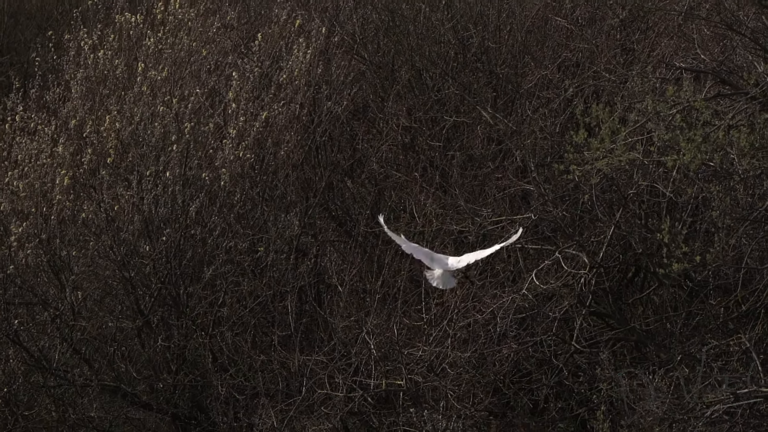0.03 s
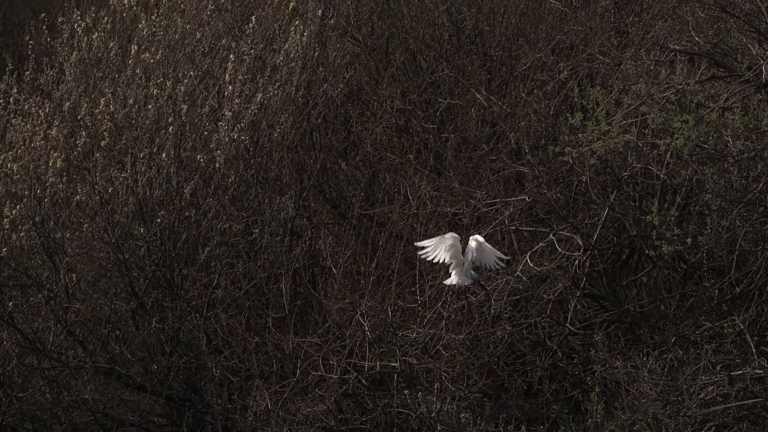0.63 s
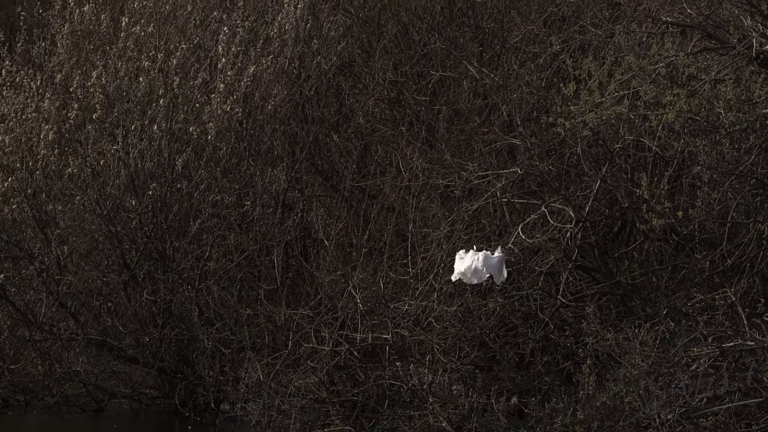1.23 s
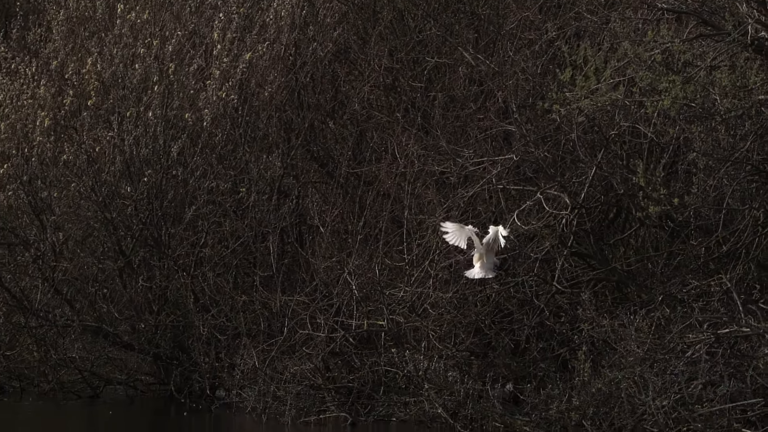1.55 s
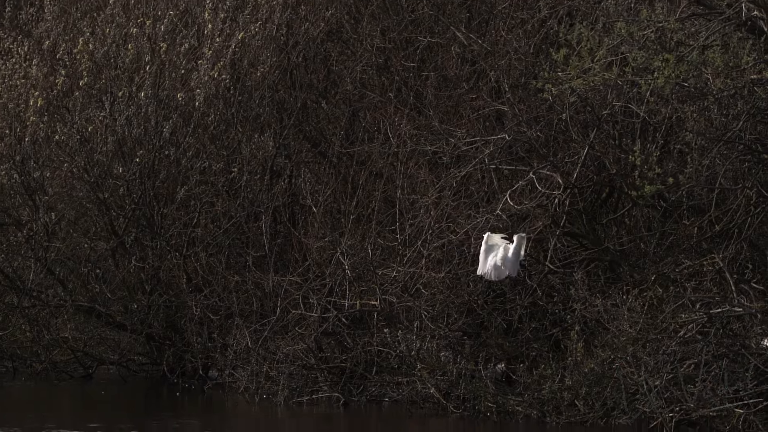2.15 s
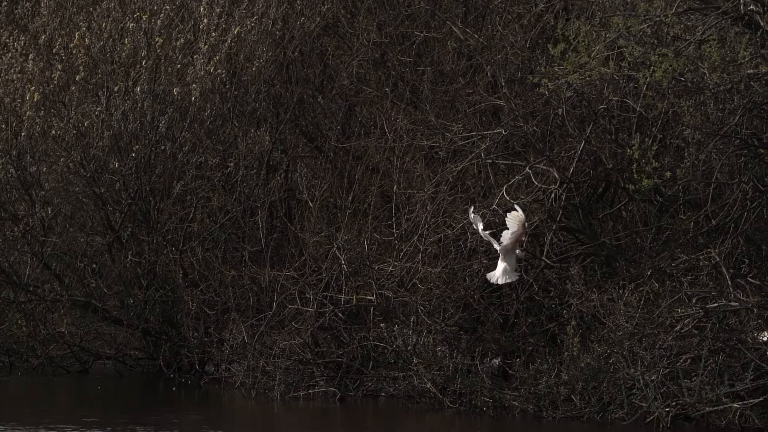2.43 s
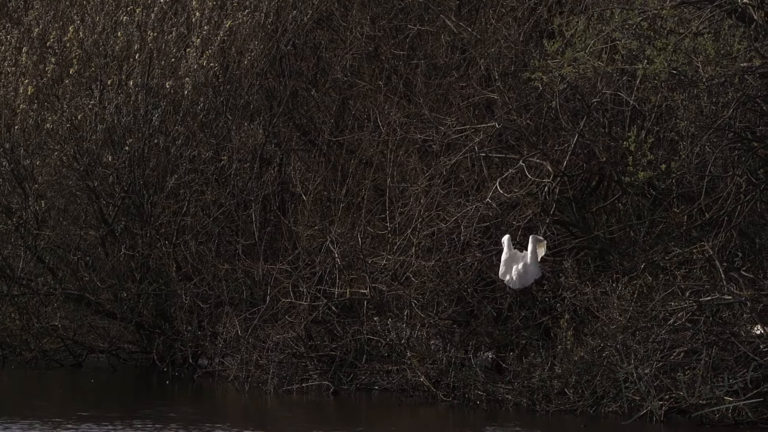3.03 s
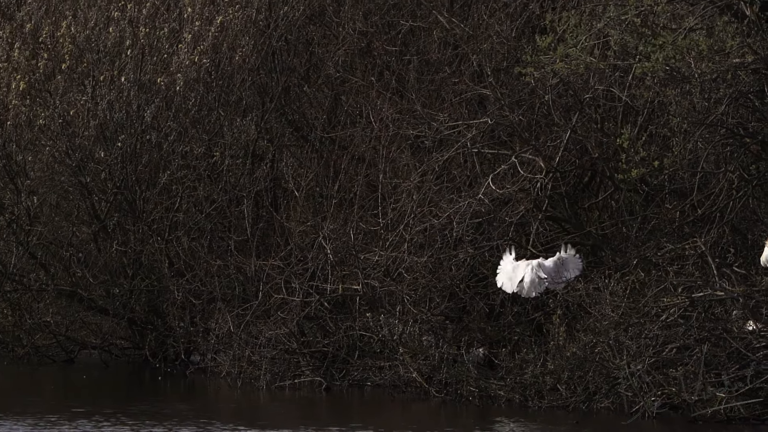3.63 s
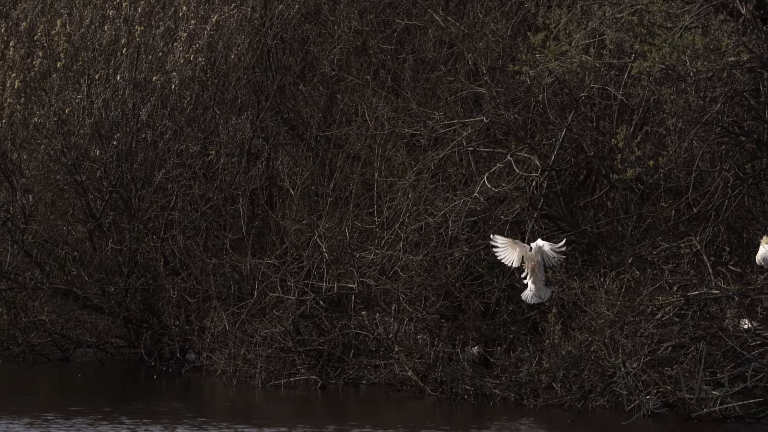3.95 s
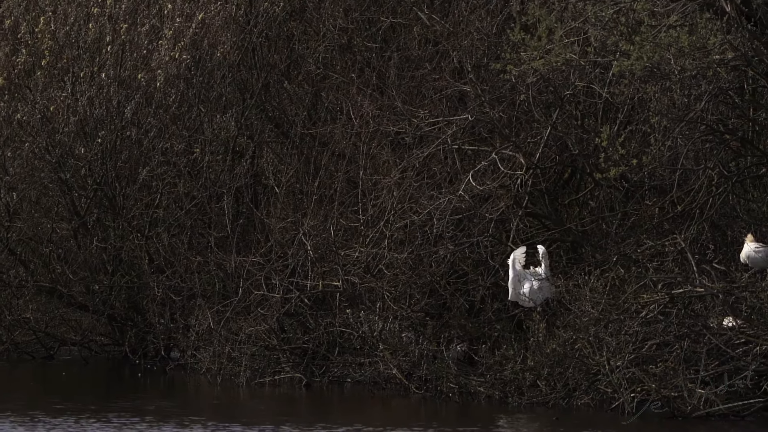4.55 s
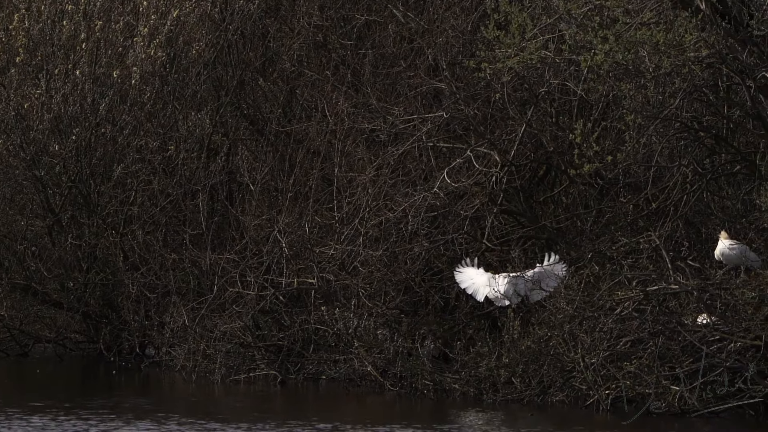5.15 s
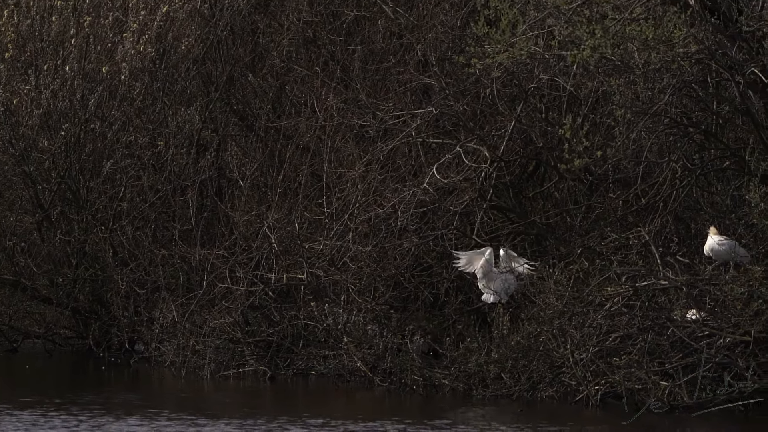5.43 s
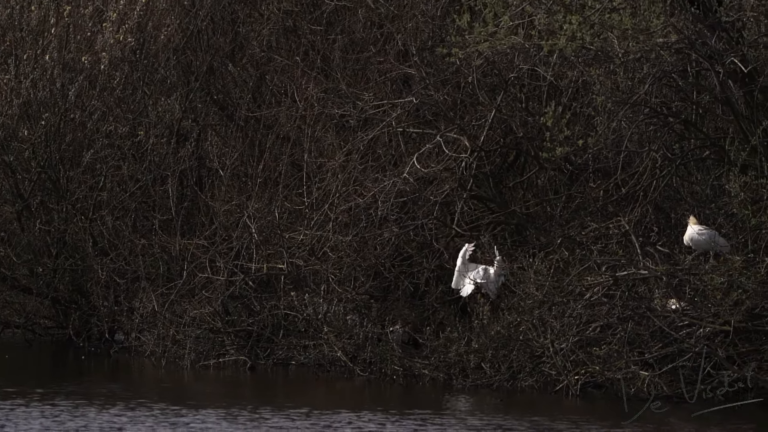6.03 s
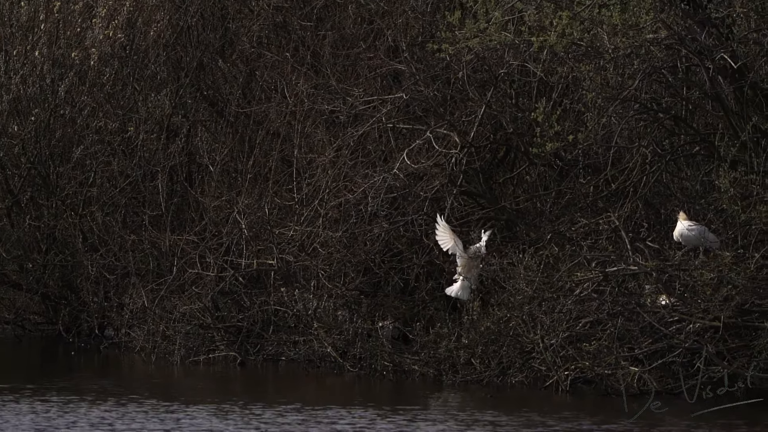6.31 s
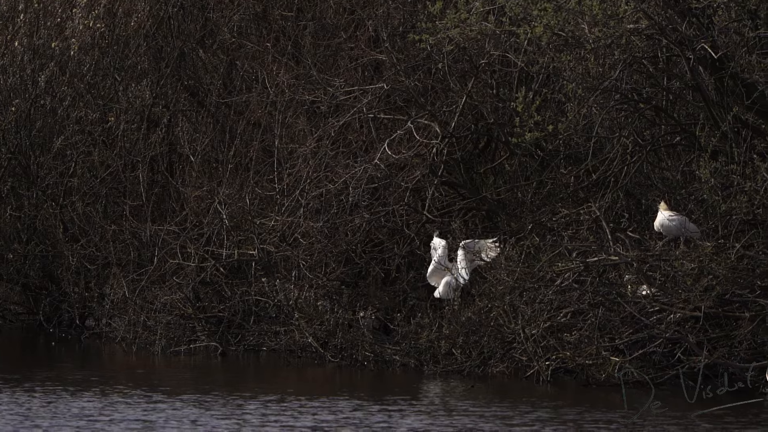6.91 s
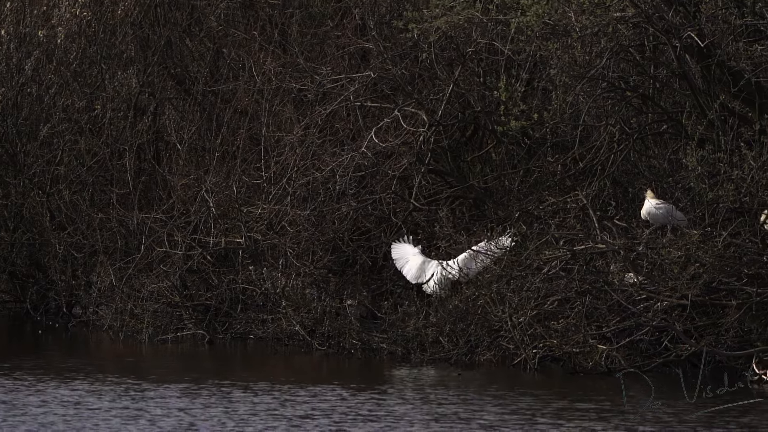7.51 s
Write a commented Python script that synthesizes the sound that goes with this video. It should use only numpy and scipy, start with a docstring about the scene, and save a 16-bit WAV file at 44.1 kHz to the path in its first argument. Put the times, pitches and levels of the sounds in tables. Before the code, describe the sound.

A nearby songbird repeats a short, high, looping note while other birds chip, whistle and twitter farther off in quiet open air.

```python
"""Songbirds at a marsh edge

A near songbird repeats a short, high, looping note, an almost pure tone shaped by its beak.
A second bird gives three double chips with both sides of its syrinx; others whistle, trill and
twitter farther off. Reeds and trees scatter every call, over a faint hush of open air."""
import sys
import numpy as np
from scipy import signal
from scipy.io import wavfile
from scipy.ndimage import uniform_filter1d

SR = 44100
rng = np.random.default_rng(int(sys.argv[2]) if len(sys.argv) > 2 else 0)


def waveform_to_disk(signal):
    """Save audio, clipped to [-1, 1], as 16-bit WAV at the path in sys.argv[1]."""
    frames = np.transpose(np.atleast_2d(signal))
    scaled = np.clip(frames, -1, 1) * 32767
    samples = np.round(scaled).astype(np.int16)
    wavfile.write(sys.argv[1], SR, samples)


N = 342657
TIME = np.arange(N) / SR


def amp(db):
    return 10 ** (np.asarray(db) / 20)


def unit_rms(x):
    return x / np.sqrt(np.mean(x ** 2) + 1e-20)


def at_frequency(curve, hz):
    knots_hz, values = np.transpose(curve)
    return np.interp(np.log(hz + 1), np.log(knots_hz), values)


def add(mix, start_s, sound):
    part = mix[:, max(round(start_s * SR), 0):][:, :sound.shape[1]]
    part += sound[:, :part.shape[1]]


def panned(sound, pan_db):
    """Level difference gives direction: pan_db is left minus right."""
    left = amp(pan_db) / (1 + amp(pan_db))
    return 2 * np.array([sound * left, sound * (1 - left)])


def phase_of(hz):
    return 2 * np.pi * np.cumsum(hz) / SR


def progress(length_s):
    return np.linspace(0, 1, int(length_s * SR))


def ease(t, start, end):
    """A raised-cosine step from 0 to 1."""
    return (1 - np.cos(np.pi * np.clip((t - start) / (end - start), 0, 1))) / 2


def waver(count, size):
    """Low-passed noise of rms near 1 that changes over about size samples."""
    smooth = uniform_filter1d(uniform_filter1d(rng.standard_normal(count + 4000), size), size)
    return unit_rms(smooth)[2000:2000 + count]


def patchy_noise(spectrum, patchy_db, coherence=None):
    """Spectral shaping: stereo noise of rms 1 whose level drifts in patches of time and frequency."""
    hz = np.fft.rfftfreq(1024, 1 / SR)
    a, b, c, d, patches = rng.standard_normal((N // 256 + 5, 513, 5)).T
    patches = unit_rms(uniform_filter1d(uniform_filter1d(patches, size=16, axis=1), size=3, axis=0))
    shared = at_frequency(coherence, hz)[:, None] if coherence else 0
    left = a + 1j * b
    right = shared * left + np.sqrt(1 - shared ** 2) * (c + 1j * d)
    gain = amp(at_frequency(spectrum, hz)[:, None] + patchy_db * patches)
    return unit_rms(signal.istft(gain * np.array([left, right]), nperseg=1024, noverlap=768)[1][:, :N])


def whistle(hz, level_db, pan_db, wobble=.008, flutter_db=2):
    """A far note: a sine with slight random frequency and amplitude modulation."""
    hz = hz * (1 + wobble * waver(len(hz), size=120))
    envelope = amp(level_db + flutter_db * waver(len(hz), size=300)) * signal.windows.tukey(len(hz), .5)
    return panned(envelope * np.sin(phase_of(hz)), pan_db)


# Spectrum of the hush: frequency_hz, relative_db
AIR_SPECTRUM = [(30, -30.5), (100, -30.5), (170, -23.5), (300, -9.5), (450, -1), (750, -8), (1150, -2.5),
                (1700, -4), (4000, -6), (8000, -15.5), (10500, -22.5), (16000, -28.5)]
# Likeness of left and right: frequency_hz, coherence
AIR_COHERENCE = [(60, .3), (240, 1), (480, .85), (960, .35), (1900, 0.16)]


def open_air(level_db=-84):
    """Broadband ambient noise, most coherent between the channels in the low mids."""
    return amp(level_db) * patchy_noise(AIR_SPECTRUM, patchy_db=2, coherence=AIR_COHERENCE)


# Spectra of the low and high distant singers: frequency_hz, relative_db
LOW_SPECTRUM = [(300, -68.5), (1500, -29.5), (2000, -18), (2400, -7), (2900, 3), (3700, 2), (4400, -6.5),
                (5200, -39.5), (9000, -64)]
HIGH_SPECTRUM = [(1000, -69.5), (3300, -31.5), (4400, 0.5), (5400, 0), (6600, -9.5), (7400, -18),
                 (8500, -27.5), (10000, -39.5), (14000, -67.5)]
# Their envelopes, before each band's gain: time_s, level_db
LOW_ENVELOPE = [(0.0, -70.5), (0.24, -70.5), (0.86, -72.5), (1.17, -70), (1.56, -73), (2.34, -71.5),
                (2.55, -65.5), (3.74, -65.5), (3.94, -73.5), (4.33, -80), (4.89, -78), (5.15, -70),
                (5.3, -76), (6.04, -80.5), (7.62, -74), (7.77, -72)]
HIGH_ENVELOPE = [(0.0, -69.5), (0.24, -73.5), (0.95, -66.5), (1.06, -66), (1.71, -67), (2.57, -78),
                 (4.28, -69), (4.41, -66), (4.93, -74.5), (5.11, -73), (5.26, -62.5), (5.54, -62),
                 (5.97, -66), (6.14, -73), (6.79, -74.5), (6.9, -72), (7.1, -77.5), (7.77, -74)]


def chorus(low_gain_db=6.5, high_gain_db=.5, pan_db=2):
    """Incoherent summation: many distant singers, blurred by trees, merge into two bands of noise."""
    low_db = low_gain_db + np.interp(TIME, *np.transpose(LOW_ENVELOPE))
    high_db = high_gain_db + np.interp(TIME, *np.transpose(HIGH_ENVELOPE))
    low = amp(low_db) * patchy_noise(LOW_SPECTRUM, patchy_db=6)
    high = amp(high_db) * patchy_noise(HIGH_SPECTRUM, patchy_db=6)
    return (low + high) * amp([[pan_db / 2], [-pan_db / 2]])


# Frequency response of the near bird's beak: pitch_hz, gain_db
BEAK_RESPONSE = [(3450, -1), (3800, 0.5), (4130, 3), (4450, 7.5), (4950, 3), (5600, -1.5), (6400, 5.5),
                 (6950, -9.5), (7500, -25.5)]
# Stereo balance of its voice: pitch_hz, pan_db
VOICE_PAN = [(3450, 1), (3700, 2), (3950, 5.5), (4200, 6.5), (4650, -2.3), (5300, 8.5), (6400, 6.5)]


def near_voice(hz, source_db, gate, wobble=.002, flutter_db=1.77, octave_db=-45, left_lag_s=.00003):
    """Source and filter: an almost pure, slightly unsteady tone is weighted by the beak's response."""
    hz = hz * (1 + wobble * waver(len(hz), size=60))
    phase = phase_of(hz) - 2 * np.pi * hz * np.array([[left_lag_s], [0]])
    level_db = source_db + at_frequency(BEAK_RESPONSE, hz) + flutter_db * waver(len(hz), size=150)
    envelope = uniform_filter1d(amp(level_db), size=35) * gate
    # the beak passes the octave only near the crest of the note
    octave = amp(octave_db) * np.interp(hz, [3500, 4100, 4500], [0, 1, 0])
    tone = np.sin(phase) + octave * np.sin(2 * phase)
    return np.sqrt(2) * panned(envelope, at_frequency(VOICE_PAN, hz)) * tone


# The near bird's notes:
# start_s, source_db, first_hz, bend_start_s, second_hz, last_hz, length_s, level_change_db
LOOPING_NOTES = [(0.02, -37.5, 3440, 0.028, 4100, 3450, 0.12, -2.5),
                 (0.4853, -38, 3450, 0.034, 4140, 3560, 0.12, -2.5),
                 (0.9153, -37, 3455, 0.033, 4163, 3530, 0.12, 0),
                 (1.334, -36, 3450, .031, 4096, 3494, .122, -5.5),
                 (1.8084, -38, 3515, 0.033, 4137, 3500, 0.12, -5.5),
                 (3.8447, -37.5, 3540, .031, 4106, 3760, .12, -5.5),
                 (4.2699, -33.5, 5333, 0.043, 3550, 3526, .108, -10.5),
                 (4.6856, -38.5, 3837, 0.015, 3998, 3883, .098, 5),
                 (5.072, -36.5, 3450, 0.034, 4110, 3620, 0.12, -1),
                 (5.4871, -35.5, 3472, 0.032, 4115, 3394, .12, -4),
                 (5.9047, -34.5, 3463, .031, 4154, 3580, .122, -4.5),
                 (6.3316, -36, 3477, 0.033, 4085, 3467, 0.13, -4.5),
                 (6.7683, -35.5, 3457, 0.028, 4137, 3490, 0.12, -2.5)]


def looping_notes(top_hz=7400, plunge_s=.01, bend_end_s=.07, attack_s=.0013, release_s=.056):
    """Frequency glides: each note plunges to one pitch, bends to a second and drifts to a last."""
    out = np.zeros((2, N))
    for start_s, source_db, first_hz, bend_s, second_hz, last_hz, length_s, change_db in LOOPING_NOTES:
        t = np.arange(0, length_s, 1 / SR)
        plunge = (top_hz - first_hz) * np.exp(-(t / plunge_s) ** 1.7)
        bend = (second_hz - first_hz) * ease(t, bend_s, bend_end_s)
        drift = (last_hz - second_hz) * ease(t, bend_end_s, .9 * length_s)
        hz = first_hz + plunge + bend + drift
        gate = ease(t, 0, attack_s) * np.sin(np.pi / 2 * np.minimum((length_s - t) / release_s, 1))
        add(out, start_s, near_voice(hz, source_db + change_db * t / length_s, gate))
    return out


# Far falling whistles: start_s, length_s, start_hz, level_db, pan_db
FALLING_WHISTLES = [(0.074, .075, 3150, -56.5, 9), (0.31, 0.048, 3520, -54.5, 9.5),
                    (0.764, 0.024, 4000, -55.5, 9), (0.876, 0.055, 6560, -74, -2),
                    (1.275, 0.053, 6270, -71, -0.5), (1.699, .027, 4595, -56, -7.5),
                    (2.004, 0.055, 6490, -65, 11), (2.365, 0.021, 7000, -67, 10),
                    (2.749, 0.015, 6950, -68.5, 12), (2.81, .034, 4580, -59.5, -2.5),
                    (4.222, 0.12, 6380, -63, -0.5), (5.049, 0.057, 6210, -62, -7.5),
                    (6.499, .053, 2920, -75.5, -0.5), (7.614, 0.07, 2725, -70.5, 15)]


def falling_whistles(fall=.27):
    """Linear chirps, each losing the same fraction of its pitch."""
    out = np.zeros((2, N))
    for start_s, length_s, start_hz, level_db, pan_db in FALLING_WHISTLES:
        add(out, start_s, whistle(start_hz * (1 - fall * progress(length_s)), level_db, pan_db))
    return out


def stray_whistles(per_s=6, pitch_hz=(3026, 5620), length_s=(.025, .07), max_fall=.26, level_db=-75):
    """Faint downward chirps, one at a random moment in each equal time slot."""
    out = np.zeros((2, N))
    for slot, (late, height, span, slope, size, side) in enumerate(rng.random((int(per_s * N / SR), 6))):
        u = progress(np.interp(span, [0, 1], length_s))
        hz = np.interp(height, [0, 1], pitch_hz) * (1 - max_fall * slope * u)
        add(out, (slot + late) / per_s, whistle(hz, level_db + 8 * (size - .5), pan_db=12 * (side - .5)))
    return out


# Flicks that finish most of the near bird's notes: start_s, source_db
NOTE_FLICKS = [(0.132, -43), (0.594, -45), (1.026, -42), (1.446, -44.5), (1.922, -45), (5.185, -41.5),
               (5.597, -41), (6.014, -39.5), (6.446, -40), (6.877, -40.5)]


def flicks(start_hz=3200, peak_hz=5123, end_hz=4377, peak_s=.024, full_s=.032, length_s=.053):
    """A quick glide up and partly back, whose source level crests just after its pitch."""
    out = np.zeros((2, N))
    t = np.arange(0, length_s, 1 / SR)
    fade_s = .005
    rise = (peak_hz - start_hz) * ease(t, 0, peak_s)
    fall = (end_hz - peak_hz) * ease(t, peak_s, length_s - fade_s)
    swell_db = -14.5 * (1 - ease(t, .019, full_s)) - 5 * ease(t, full_s, length_s)
    gate = ease(t, 0, fade_s) * ease(length_s - t, 0, fade_s)
    for start_s, source_db in NOTE_FLICKS:
        add(out, start_s, near_voice(start_hz + rise + fall, source_db + swell_db, gate))
    return out


# Far piping notes: start_s, length_s, pitch_hz, level_db, pan_db
PIPING_NOTES = [(0.139, 0.15, 933, -93, 0), (0.364, 0.044, 4470, -63.5, 1), (.87, 0.088, 1880, -78.5, -0.5),
                (1.511, 0.057, 4434, -52.5, -8.5), (1.613, .04, 4950, -53, -6),
                (2.274, 0.082, 4754, -64, 1.5), (2.721, 0.021, 4490, -59, -7),
                (3.008, 0.024, 4080, -54.5, -3), (3.094, 0.078, 3910, -60, -7),
                (3.186, 0.096, 3016, -62.5, 3), (3.391, 0.019, 3180, -57, 1.5), (3.4, .14, 2494, -64, 2.5),
                (4.933, .06, 3310, -67, -1.5), (5.597, .12, 7960, -77.5, 3),
                (6.274, 0.094, 4416, -62, -5.5), (6.683, 0.064, 1406, -86.5, -3),
                (6.963, 0.16, 6370, -79.5, 14), (7.35, 0.11, 4800, -68.5, -1),
                (7.519, 0.099, 4676, -64.5, -4), (7.603, 0.056, 1418, -83, 2)]


def piping_notes(droop=.02):
    """Nearly steady tones whose frequency follows a shallow parabolic arch."""
    out = np.zeros((2, N))
    for start_s, length_s, pitch_hz, level_db, pan_db in PIPING_NOTES:
        arch = 1 - droop * (2 * progress(length_s) - 1) ** 2
        add(out, start_s, whistle(pitch_hz * arch, level_db, pan_db))
    return out


# Far rising whistles: start_s, length_s, target_hz, level_db, pan_db
RISING_WHISTLES = [(0.192, .18, 3390, -57.5, 10), (0.849, 0.044, 2604, -75.5, -0.5),
                   (1.008, 0.15, 3015, -59.5, 10.5), (1.774, 0.15, 2703, -61, 7.5),
                   (2.478, 0.14, 2693, -60.5, 4), (4.945, 0.19, 2395, -81, 1),
                   (7.277, 0.053, 6970, -72.5, 9)]


def rising_whistles(depth=.3, rise_s=.037, sag=.045):
    """Upward chirps that approach a target frequency asymptotically, less a slight sag."""
    out = np.zeros((2, N))
    for start_s, length_s, target_hz, level_db, pan_db in RISING_WHISTLES:
        u = progress(length_s)
        contour = 1 - depth * np.exp(-(u * length_s / rise_s) ** 2) - sag * u ** 2
        add(out, start_s, whistle(target_hz * contour, level_db, pan_db))
    return out


# Far trills: start_s, length_s, start_hz, end_hz, swing_hz, pulse_rate_hz, level_db, pan_db
BUZZY_TRILLS = [(1.098, 0.081, 7430, 8000, 790, 66, -83, 0), (2.208, 0.49, 8430, 8200, 70, 61, -77.5, -4),
                (3.096, 0.039, 5270, 5460, 450, 100, -58.5, 2), (3.602, .27, 3120, 3750, 382, 97, -60, 7.5),
                (3.93, .13, 6980, 7190, 330, 130, -68.5, 10.5),
                (4.05, .28, 7270, 7200, 546, 86, -72.5, 9.5), (4.298, .31, 6590, 6500, 634, 100, -68, 4),
                (5.579, 0.33, 5300, 6220, 850, 84, -73.5, 11.5)]


def trills(pulse_depth=.61, rate_wobble=.064):
    """Amplitude and frequency modulation at one fast rate make sidebands, heard as a buzz."""
    out = np.zeros((2, N))
    for start_s, length_s, start_hz, end_hz, swing_hz, rate_hz, level_db, pan_db in BUZZY_TRILLS:
        count = int(length_s * SR)
        pulse = phase_of(rate_hz * (1 + rate_wobble * waver(count, size=300)))
        swing = np.sin(pulse) + .34 * waver(count, size=60)
        hz = np.linspace(start_hz, end_hz, count) + swing_hz * swing
        envelope = amp(level_db) * (1 - pulse_depth * np.cos(pulse)) * signal.windows.tukey(count, .4)
        add(out, start_s, panned(envelope * np.sin(phase_of(hz)), pan_db))
    return out


def twitters(from_s=2.13, to_s=2.93, per_s=28, length_s=.019, pitch_hz=(3055, 4403), level_db=-59.5):
    """A far bird's jittered train of brief downward chirps at random pitches."""
    out = np.zeros((2, N))
    for slot_s in np.arange(from_s, to_s, 1 / per_s):
        late, height, slope, size = rng.random(4)
        hz = np.interp(height, [0, 1], pitch_hz) * (1 + .09 * slope * (1 - 2 * progress(length_s)))
        add(out, slot_s + .02 * late, whistle(hz, level_db + 6 * (size - .5), pan_db=0))
    return out


# The second bird's chips: start_s, length_s, low_nominal_hz, high_nominal_hz, low_octave_db, high_db
DOUBLE_CHIPS = [(2.941, 0.025, 3020, 3840, -54, -54), (2.986, 0.031, 3065, 4125, -59.5, -47.5),
                (3.448, .025, 3094, 3840, -52, -53), (3.497, 0.028, 3270, 4230, -57, -45),
                (7.554, 0.031, 3195, 3950, -55, -51.5), (7.606, 0.028, 3030, 4150, -56.5, -44)]


def chips(fundamental_db=-9, products_db=-10, wobble=.011, pan_db=3):
    """Intermodulation: two falling voices, one from each side of the syrinx, add rasping partials."""
    out = np.zeros((2, N))
    for start_s, length_s, low_hz, high_hz, low_octave_db, high_db in DOUBLE_CHIPS:
        u = progress(length_s)
        low_glide = np.interp(u, [0, .35, .7, 1], [.97, .94, .93, .7])
        high_glide = np.interp(u, [0, .22, .5, 1], [1.4, 1.09, 1.0163, .85])
        low = phase_of(low_hz * low_glide * (1 + wobble * waver(len(u), size=25)))
        high = phase_of(high_hz * high_glide * (1 + wobble * waver(len(u), size=25)))
        low_voice = np.sin(2 * low) + amp(fundamental_db) * np.sin(low)
        products = np.sin(low + high) + 1.6 * np.sin(2 * high - low) + .1 * np.sin(2 * high)
        rasp = amp(low_octave_db) * (low_voice + amp(products_db) * products)
        swell = np.sin(np.pi * u)
        high_voice = amp(high_db) * swell * np.sin(high)
        add(out, start_s, panned(np.sqrt(2) * swell * (rasp + high_voice), pan_db))
    return out


def thicket(calls, twig_db, twig_t60_s, twig_db_per_octave, tree_db, tree_t60_s, treble_loss):
    """Multiple scattering: twigs give a short echo, trees a long tail whose treble dies sooner."""
    taps = rng.standard_normal((2, 2 * SR)) * (rng.random((2, 2 * SR)) < .1)
    taps[:, :130] = 0  # nothing returns in the first 3 ms
    hz, t, spectra = signal.stft(taps, SR, nperseg=256)
    octaves = np.log2(np.clip(hz[:, None], 2000, 9000) / 4000)
    tilt_db = twig_db_per_octave * np.minimum(octaves, .5)
    twigs = amp(twig_db + tilt_db - 60 * t / twig_t60_s) / np.sqrt(twig_t60_s)
    trees = amp(tree_db - 60 * t / tree_t60_s * 2 ** (treble_loss * octaves)) / np.sqrt(tree_t60_s)
    response = signal.istft(spectra * (twigs + trees), SR, nperseg=256)[1]
    response *= np.sqrt(2 * np.log(1000) / SR) / taps.std()  # a 0 dB tail has unit energy
    return signal.fftconvolve((calls + calls.mean(0)) / 2, response, axes=1)[:, :N]


def scene(bank_delay_s=.018, bank_db=-28):
    """The direct-to-reverberant ratio conveys distance: near birds are almost dry, far ones half echo."""
    near = looping_notes() + flicks() + chips()
    far = rising_whistles() + falling_whistles() + piping_notes() + stray_whistles()
    far += trills() + twitters()
    near_echo = thicket(near, twig_db=-23.5, twig_t60_s=.2, twig_db_per_octave=17,
                        tree_db=-22, tree_t60_s=.77, treble_loss=.16)
    add(near_echo, bank_delay_s, amp(bank_db) * near[::-1])  # reflection off the bank, sides swapped
    far_echo = thicket(far, twig_db=-3.5, twig_t60_s=.49, twig_db_per_octave=-1.5,
                       tree_db=-2.5, tree_t60_s=1.1, treble_loss=.99)
    return near + near_echo + far + far_echo + chorus() + open_air()


def record(dry):
    """Band limiting: a linear-phase low-pass filter at 15.5 kHz."""
    lowpass = signal.firwin(511, 15500, window=("kaiser", 9), fs=SR)
    return signal.oaconvolve(dry, lowpass[None], "same")


dry = scene()
out = record(dry)
waveform_to_disk(out)
```